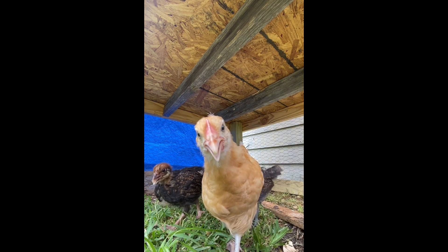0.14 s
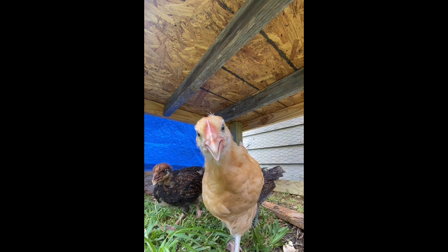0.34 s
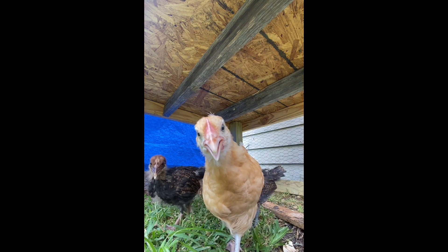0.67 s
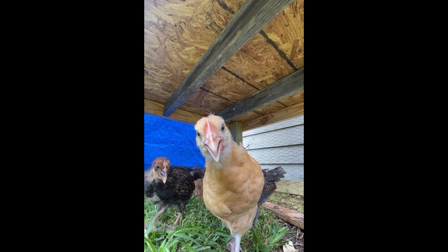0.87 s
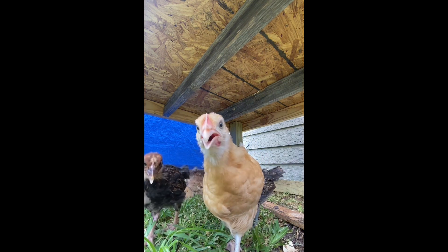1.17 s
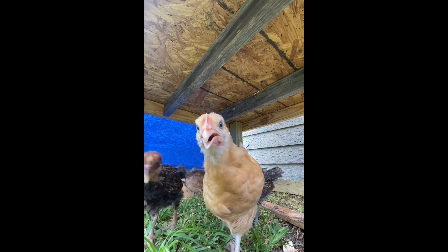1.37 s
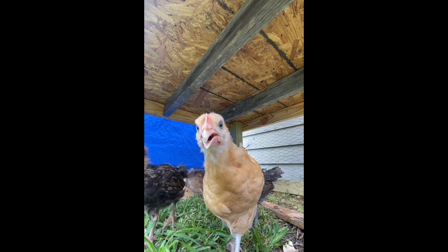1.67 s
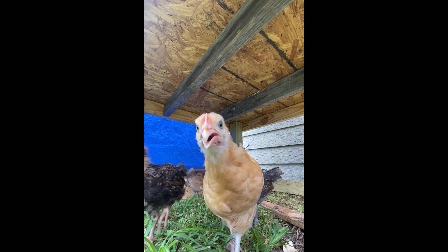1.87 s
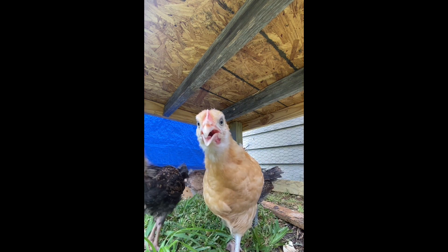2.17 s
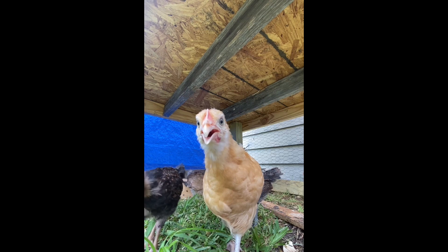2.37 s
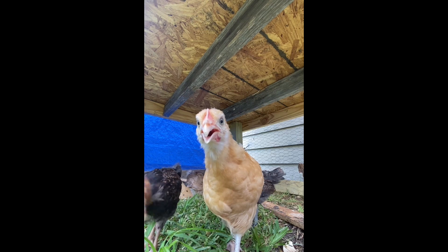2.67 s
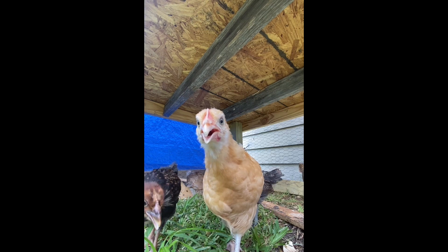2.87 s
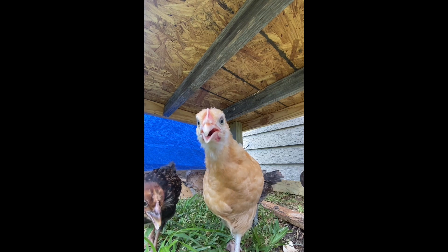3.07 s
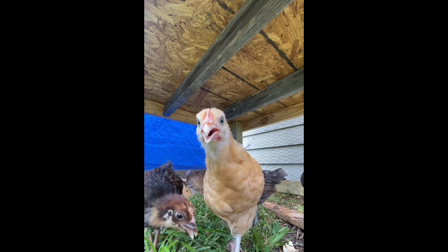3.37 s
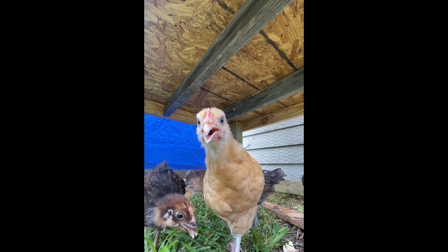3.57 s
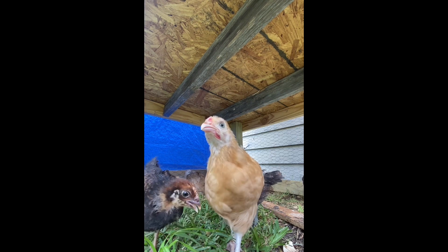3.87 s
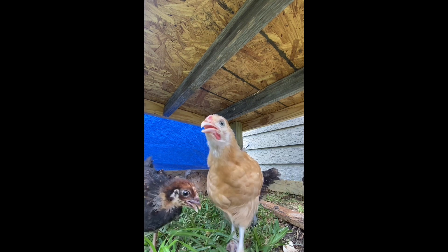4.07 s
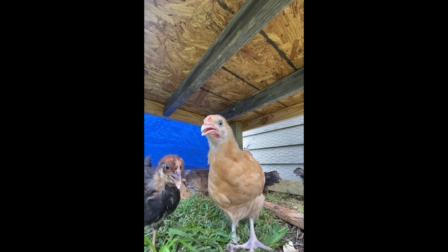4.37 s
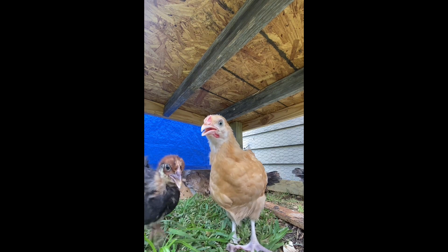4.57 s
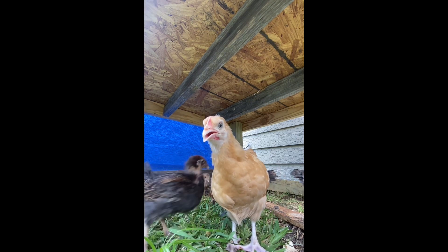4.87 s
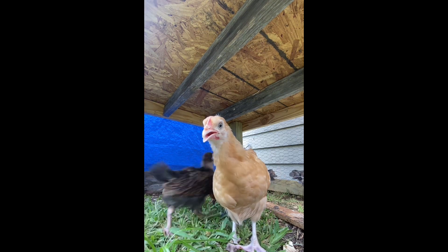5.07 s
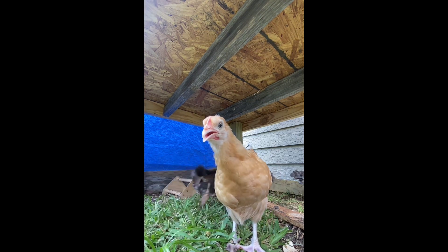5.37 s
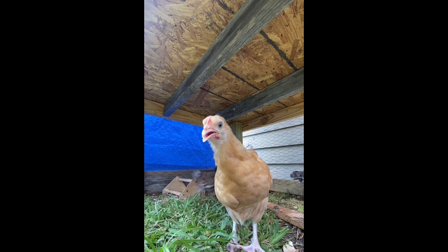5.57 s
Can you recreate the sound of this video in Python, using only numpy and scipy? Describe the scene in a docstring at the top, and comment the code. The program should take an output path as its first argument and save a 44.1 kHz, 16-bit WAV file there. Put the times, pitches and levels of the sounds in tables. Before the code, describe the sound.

Outdoors in a sheltered coop run, a low fan hum and rumble continue throughout. Grass rustles lightly at first, with one peep and faint birds farther away; then a piercing chirp and a soft bird huff. Later, scattered peeps come more often, with foot sweeps, dry snaps and claw ticks, all close in stereo with a very short echo off the boards.

```python
"""A distant fan motor hums over low outdoor rumble while feet rustle and tick in the grass; then young
chickens peep close to a small stereo microphone under a low wooden roof, fainter birds further off.
Hum is wavering sines; rumble and rustle are shaped noise, ticks short band-limited noise bursts.
Peeps are gliding near-sines with weak harmonics; one husky huff is noise through resonances.
A short echo from the roof follows the peeps and ticks."""
import sys
import numpy as np
from scipy import signal
from scipy.fft import rfft, irfft, next_fast_len
from scipy.io import wavfile
from scipy.ndimage import uniform_filter1d

SR = 44100
rng = np.random.default_rng(int(sys.argv[2]) if len(sys.argv) > 2 else 0)


def store_pcm(level_fs):
    """Save levels as 16-bit WAV."""
    pcm = np.round(np.clip(level_fs, -1, 1) * 32767).astype(np.int16)
    wavfile.write(sys.argv[1], SR, np.atleast_2d(pcm).T)


def gain_from_decibels(decibels):
    """Convert decibel values to linear amplitude factors."""
    exponent = np.asarray(decibels, float) / 20
    return 10 ** exponent


N = 252693


def rms_one(x):
    """Scale to rms 1."""
    return x / np.sqrt(np.mean(x ** 2))


def at_hz(points, hz, column):
    """Read one column of a table on a log-frequency axis."""
    points = np.array(points)
    return np.interp(np.log(hz + 1), np.log(points[:, 0] + 1), points[:, column])


def drift(rate_hz):
    """Random wander, spread 1: white noise through two equal one-pole low-passes."""
    r = np.exp(-2 * np.pi * rate_hz / SR)
    wander = signal.lfilter([1], [1, -2 * r, r * r], rng.standard_normal(N + SR))[SR:]
    return wander / wander.std()


# stereo image of the noise layers:
# (frequency [Hz], likeness of the channels [0-1], left leads [rad], left minus right [dB])
STEREO_IMAGE = [(39.7, 0.91, -0.65, -4.5), (130, 1, 0.34, -3.5), (250, 0.82, 0.14, -6),
                (400, .55, 0.94, -8.5), (600, 0.9, 2, -2.5), (1080, 0.4, 3.5, 1), (1500, 0.61, 1.64, 2),
                (2200, .5, 3, 1), (3000, 0.5, 2.5, -0.5), (4780, 0.5, 2, -2.5), (5423, 0.64, 7, -2),
                (7000, 0.9, 7.0, -0.5), (8500, 0.74, 8.0, 1.5), (10000, 0.8, 8, 0), (11500, 1, 10, 1.5),
                (12570, 1, 9.5, 0)]


def stereo_noise(spectrum):
    """Noise of a given spectrum in two channels: partly alike, shifted in phase, leaning to one side."""
    size = next_fast_len(N)
    hz = np.arange(size // 2 + 1) * SR / size
    inside = (hz > spectrum[0][0]) * (hz < spectrum[-1][0])
    shape = gain_from_decibels(at_hz(spectrum, hz, column=1)) * inside * np.sqrt(SR / 2)
    left, other = rfft(rng.standard_normal((2, size))) * shape
    alike = np.clip(at_hz(STEREO_IMAGE, hz, column=1), 0, 1)
    right = alike * left + np.sqrt(1 - alike ** 2) * other
    right = right * np.exp(-1j * at_hz(STEREO_IMAGE, hz, column=2))
    lean = gain_from_decibels(at_hz(STEREO_IMAGE, hz, column=3) / 2)
    return irfft([left * lean, right / lean], size)[:, :N]


# low outdoor rumble, before the stereo lean: (frequency [Hz], density [dB per Hz])
RUMBLE_SPECTRUM = [(15, -105), (22, -90.5), (33, -80), (60, -72), (90, -69.5), (150, -77), (210, -81),
                   (300, -85.5), (420, -85), (560, -90), (1000, -100), (2000, -110), (4000, -121),
                   (8000, -125), (16000, -126)]


def rumble():
    """Low-heavy outdoor noise that swells and sinks a little."""
    return stereo_noise(RUMBLE_SPECTRUM) * gain_from_decibels(0.8 * drift(5.4))


# pitches of the distant fan motor's tones: frequency [Hz]
HUM_HZ = [118.8, 177, 237.6, 254, 355.3, 479.3]
# one row a tone: (rms before the waver [dB], left minus right [dB], phase waver [rad])
HUM_TONES = [(-53.5, -3, 0.84), (-69.5, -6, .6), (-62, -3.5, 0.6), (-63.5, -6, 0.2), (-71, -2.5, .4),
             (-68, -7.5, .15)]


def hum():
    """Motor tones that waver a little in size and phase on the way through the air."""
    t, out = np.arange(N) / SR, 0
    for hz, (level_db, pan_db, waver) in zip(HUM_HZ, HUM_TONES):
        phase = 2 * np.pi * hz * t + waver * drift(2.5)
        tone = np.sqrt(2) * np.sin(phase) * gain_from_decibels(level_db + 2.63 * drift(1.3))
        out = out + tone * gain_from_decibels([[pan_db / 2], [-pan_db / 2]])
    return out


# how busily the flock moves in the grass: (time [s], dull-layer level before steps and flicks [dB])
BUSTLE = [(0.0, -85), (0.2, -90), (0.5, -88), (0.56, -74), (0.7, -77), (0.76, -87), (0.9, -73), (1.2, -73),
          (1.4, -68), (1.62, -62), (1.8, -80), (1.95, -78), (2.15, -68), (2.9, -64), (3.5, -66),
          (3.95, -72), (4.3, -70), (4.55, -64), (4.74, -70), (5.3, -65), (5.73, -70)]
# a foot sweeps through the blades:
# (time [s], dull level [dB], bright minus dull [dB], time to fall 20 dB on either side [s])
STEPS = [(0.04, -63.5, 2.5, .045), (0.215, -90, 8, .02), (0.309, -74, -9, .03), (0.39, -84, 8, .09),
         (0.57, -76, 7, .06), (.65, -80, 6, .09), (0.825, -86, 12, .05), (0.91, -77, 8, .07),
         (1.27, -76, 11, .05), (1.306, -62, -5, .06), (1.62, -72, 7, .12), (2.027, -68, 13, .03),
         (2.245, -62, -15, .09), (2.295, -80, 10.5, .04), (2.47, -65, 7, .045), (2.79, -66, -6, .06),
         (2.854, -78, 8, .05), (3.25, -78, 6, .09), (3.397, -65, 6, .06), (3.65, -72, 7, .04),
         (3.76, -70, 8, .09), (3.886, -70, -1, .05), (4.135, -62, 1.5, .16), (4.375, -74, 5, .07),
         (4.535, -66, 6, .07), (4.65, -80, 9, .2), (4.81, -62, 3, .09), (4.92, -62, -1, .2),
         (4.99, -49, -9, .07), (5.135, -70, 9, .11), (5.28, -68, 6, .11), (5.37, -68, 6, .09),
         (5.49, -62, .1, .07)]
# colour of the two grass layers, shape only: (frequency [Hz], relative density [dB])
BRIGHT_SPECTRUM = [(1000, -7), (2000, 1), (4000, -3.5), (6000, -3), (8000, -1), (9300, -2), (10500, 0.5),
                   (12500, -2.5), (15000, 1.5), (16200, -1.5)]
DULL_SPECTRUM = [(400, -13.5), (700, 4), (1000, 0), (1800, -5), (2700, -6), (4000, -8.5), (6000, -13.5),
                 (7800, -13.5), (10000, -24)]
# bright layer's level when the bustle is at -70 dB, relative to it, and its dB per dB of bustle
BRIGHT_DB, BRIGHT_FOLLOWS = -11.0, 0.75


def rustle():
    """Blades rub: bright and dull noise swells with the bustle and each step, single blades flick out."""
    t = np.arange(N) / SR
    bustle_db = np.interp(t, *np.transpose(BUSTLE))
    dull = gain_from_decibels(bustle_db)
    bright = gain_from_decibels(BRIGHT_DB - 70 + BRIGHT_FOLLOWS * (bustle_db + 70))
    for s, level_db, tilt_db, fade_s in STEPS:
        sweep = gain_from_decibels(level_db - 20 * (np.abs(t - s) / fade_s) ** 1.5)
        dull = np.hypot(dull, sweep)
        bright = np.hypot(bright, sweep * gain_from_decibels(tilt_db))
    # on average 45 flicks a second of random strength, each dying with a 1.8 ms time constant
    flicks = (rng.random(N) < 45.0 / SR) * rng.exponential(1.2, N)
    fall = np.exp(-1 / (0.0018 * SR))
    grain = 1 + signal.lfilter([1], [1, -fall], flicks + 1e-18)
    bright = bright * gain_from_decibels(1.8 * drift(30) + 1.1 * drift(280)) * grain
    dull = dull * gain_from_decibels(1.2 * drift(30) + 1.65 * drift(15)) * grain ** 0.4
    return bright * rms_one(stereo_noise(BRIGHT_SPECTRUM)) + dull * rms_one(stereo_noise(DULL_SPECTRUM))


# stalks snap, claws tick:
# (time [s], level before the band filter [dB], centre [Hz], band edges over centre [ratio, 1.15 or more])
TICKS = [(0.0132, -49, 7000, 1.7), (.040, -49, 7500, 1.6), (0.2163, -60, 9000, 2.2),
         (0.67, -50, 6500, 1.27), (1.047, -58, 10000, 1.5), (1.1425, -61, 2000, 1.2),
         (1.195, -60, 7000, 1.6), (1.255, -48, 10000, 1.6), (1.307, -58, 8000, 1.8),
         (1.769, -43, 1390, 1.7), (2.02, -48, 5000, 3.0), (2.295, -52, 11000, 1.3), (2.369, -58, 5000, 2.6),
         (2.451, -49, 9040, 1.5), (2.78, -51, 11000, 1.4), (2.85, -53, 11000, 1.4), (2.958, -52, 2600, 2.2),
         (3.0315, -48, 2490, 1.4), (3.6513, -46, 7500, 1.8), (3.718, -41, 600, 2.6),
         (3.797, -50, 10000, 1.6), (3.805, -50, 5000, 1.5), (3.9214, -49.5, 7000, 1.6),
         (4.210, -40.5, 2800, 2.1), (4.262, -43.5, 1200, 1.56), (4.269, -43, 7000, 1.5),
         (4.9285, -47, 2600, 1.4), (4.998, -45, 1200, 3.2), (5.393, -49, 1200, 2.15)]
TICK_T60_S = 0.015


def ticks():
    """Each tick is a burst of dying noise in a band around its centre."""
    out, length = np.zeros((2, N)), SR // 10
    t = np.arange(length) / SR
    noise = rms_one(stereo_noise([(300, 0), (16000, 0)]))
    # a weak hiss, the same in both channels, within each tick
    noise = noise + gain_from_decibels(-9) * rng.standard_normal(N)
    envelope = gain_from_decibels(-60 * t / TICK_T60_S) * np.minimum(t / 0.0005, 1)
    for s, level_db, hz, spread in TICKS:
        at, spread = int(s * SR), max(spread, 1.15)
        snap = noise[:, at:at + length] * envelope
        band = signal.butter(2, [hz / spread, min(hz * spread, 16000)], "band", fs=SR, output="sos")
        even = np.sqrt(8000 / hz)   # offsets the narrower band of a low centre
        out[:, at:at + length] += gain_from_decibels(level_db) * signal.sosfilt(band, snap) * even
    return out


# one glide a peep: (time [s], pitch [Hz], level before roughness and port shading [dB])
PEEPS = [
    [(0.411, 2740, -45), (0.418, 2650, -38), (0.426, 2450, -42), (0.43, 2270, -30), (0.437, 2190, -35),
     (0.448, 2290, -33), (0.453, 2560, -34), (0.457, 2760, -42), (0.465, 2880, -49)],
    [(1.244, 2120, -55), (1.259, 2165, -41), (1.267, 2225, -50), (1.276, 2500, -42), (1.283, 2520, -43),
     (1.298, 2500, -51)],
    [(1.401, 3900, -39), (1.405, 4350, -35), (1.415, 4576, -26), (1.42, 4285, -30), (1.4235, 3330, -18),
     (1.426, 3130, -15.5), (1.428, 3800, -27), (1.43, 4330, -25.5), (1.434, 4520, -27), (1.438, 4450, -29),
     (1.441, 3850, -26), (1.4445, 2950, -20), (1.4485, 2720, -30), (1.451, 3050, -19), (1.4535, 3300, -21),
     (1.456, 3750, -40), (1.459, 3900, -35), (1.464, 3150, -42)],
    [(2.565, 2130, -55), (2.57, 2200, -44), (2.577, 2245, -44), (2.581, 2380, -54), (2.585, 2480, -45),
     (2.594, 2800, -40), (2.6, 3020, -50), (2.605, 3070, -52), (2.611, 2700, -47)],
    [(3.218, 2340, -46), (3.224, 2420, -38), (3.236, 2430, -33), (3.245, 2290, -43), (3.254, 2320, -45),
     (3.26, 2410, -34.5), (3.268, 2560, -47), (3.278, 2900, -46), (3.284, 2900, -51)],
    [(3.584, 2160, -46), (3.605, 2390, -30), (3.614, 2650, -38), (3.619, 2850, -50), (3.628, 2800, -38),
     (3.633, 2900, -45)],
    [(3.724, 1676, -33.5), (3.728, 2255, -32), (3.732, 2950, -44), (3.74, 3390, -39), (3.748, 3430, -43),
     (3.753, 3330, -41), (3.76, 3080, -47), (3.768, 2600, -40), (3.776, 2250, -27.5), (3.786, 2137, -35.5)],
    [(4.086, 2120, -44), (4.092, 2350, -34), (4.101, 2310, -40), (4.107, 2430, -36), (4.118, 2940, -42),
     (4.128, 3240, -45), (4.14, 3000, -47)],
    [(4.118, 1653, -32), (4.121, 1700, -26), (4.126, 2254, -26), (4.128, 2750, -46), (4.132, 3100, -38),
     (4.142, 3320, -42), (4.15, 3100, -40), (4.155, 2650, -36), (4.163, 2240, -35), (4.167, 2200, -29),
     (4.173, 2200, -39), (4.183, 2200, -47)],
    [(4.357, 2300, -50), (4.361, 2330, -28), (4.372, 2480, -28), (4.376, 2620, -32), (4.381, 2800, -47),
     (4.387, 2950, -46), (4.394, 3060, -51), (4.402, 2940, -55)],
    [(4.496, 3640, -28), (4.5, 3680, -23), (4.516, 3540, -24), (4.534, 3270, -24.5), (4.54, 2950, -32),
     (4.546, 2840, -32), (4.555, 2780, -49)],
    [(4.637, 2400, -51), (4.642, 2400, -53), (4.648, 2470, -43), (4.656, 2600, -51), (4.66, 2800, -49),
     (4.668, 3210, -59), (4.679, 3350, -58)],
    [(4.792, 2700, -45), (4.801, 2720, -39), (4.817, 2473, -30), (4.832, 2440, -29.5), (4.838, 2600, -33),
     (4.845, 2900, -48), (4.85, 3300, -48), (4.862, 2600, -50)],
    [(5.022, 2070, -36), (5.026, 2090, -29), (5.033, 2097, -25.5), (5.037, 2050, -38), (5.04, 2014, -30),
     (5.047, 1980, -37), (5.051, 1960, -55), (5.058, 2040, -46), (5.063, 2000, -48)],
    [(5.44, 2620, -55), (5.448, 2510, -58), (5.453, 2500, -47), (5.459, 2380, -52), (5.464, 2230, -58)],
    [(5.532, 2600, -54), (5.546, 3220, -53), (5.556, 2700, -36), (5.563, 2520, -32), (5.57, 2480, -32),
     (5.575, 2340, -51), (5.58, 2310, -43), (5.587, 2200, -30), (5.592, 2120, -40), (5.608, 2450, -48),
     (5.619, 2504, -35), (5.63, 2550, -45)],
]
# one row a peep: (left lags [ms], 2nd and 3rd harmonic before windpipe and lift [dB, dB],
# hoarseness [ratio], extra rasp at the end [ratio])
VOICES = [(-0.13, -16.5, -32, 0.029, 0.27), (0.158, -26, -46, 0.074, 0.55), (-0.313, -31, -43, .02, 0.23),
          (0.198, -26, -44, .05, 0.37), (0.689, -19, -21, .02, 1.2), (.59, -33, -50, 0.053, 1.3),
          (-0.484, -14, -32, .03, 0.047), (0.184, -36, -49, .1, 1.4), (0.01, -19, -41, 0.25, 0.24),
          (0.58, -31, -50, .05, 1.4), (-0.61, -49.5, -51, 0.014, 0.2), (0.547, -29, -46, 0.25, 1.6),
          (0.27, -27.5, -44, 0.046, 0.72), (-0.188, -19, -46, 0.08, 0.15), (0.26, -36, -47, 0.25, .3),
          (-0.087, -16.5, -24, 0.077, .4)]
# the voice breaks, every second cycle weaker:
# (middle [s], half length [s], half-pitch tone [dB], 3/2-pitch tone [dB])
BREAKS = [(1.267, 0.0058, -2.5, -8.5), (3.597, 0.0087, -10.5, -22), (4.097, 0.0083, -10, -15),
          (5.031, 0.0088, -29, -21), (5.604, 0.0047, 3.5, -11.5)]
# what the windpipe passes of the harmonics: (frequency [Hz], gain [dB])
WINDPIPE = [(3000, -32), (4300, -6), (5600, -2), (6700, 4), (8500, -1.5), (10500, -11.5), (13000, -4.5)]
# microphone body and nearby boards shade one port more at some pitches:
# (pitch [Hz], left minus right [dB])
SHADE = [(1650, 3), (2010, 8), (2090, -11), (2180, -8), (2260, .1), (2480, -6), (2850, -2.5), (3250, -14),
         (3420, -15), (3650, -11), (4300, -2.5)]
# swell before a glide and dying after it, on top of the edge fade; room left for each
ATTACK_DB_PER_S, RELEASE_DB_PER_S, EDGE_S = 5000.0, 2500.0, 0.012


def peeps():
    """A syrinx near-sine with weak harmonics; hoarseness shakes size and pitch, growing as breath runs out."""
    out, tremor, wobble = np.zeros((2, N)), drift(290), drift(306)
    second_waver, third_waver = drift(90), drift(90)
    for rows, (lag_ms, second_db, third_db, hoarse, rasp) in zip(PEEPS, VOICES):
        s, pitch, level_db = np.transpose(rows)
        span = slice(int((s[0] - EDGE_S) * SR), int((s[-1] + EDGE_S) * SR))
        t = np.arange(span.start, span.stop) / SR
        progress = (t - t[0]) / (t[-1] - t[0])
        rough = hoarse + rasp * progress ** 4.0

        glide = uniform_filter1d(np.interp(t, s, pitch), size=88)
        hz = glide * (1 + 0.071 * rough * wobble[span])
        phase = 2 * np.pi * np.cumsum(hz) / SR

        fade = np.clip(np.minimum(t - t[0], t[-1] - t) / 0.005, 0, 1) ** 2
        level = np.interp(t, s, level_db)
        level = level - ATTACK_DB_PER_S * np.maximum(s[0] - t, 0)
        level = level - RELEASE_DB_PER_S * np.maximum(t - s[-1], 0)
        size = gain_from_decibels(level) * fade * (1 + rough * tremor[span]) / np.sqrt(1 + rough ** 2)

        # the throat lifts the fundamental at some pitches; harmonics swell less
        lift_db = 0.57 * np.minimum(level.max() - level, 14)
        second_db = second_db + lift_db + at_hz(WINDPIPE, 2 * hz, column=1)
        third_db = third_db + lift_db + at_hz(WINDPIPE, 3 * hz, column=1)
        second = gain_from_decibels(second_db + 3.5 * second_waver[span])
        third = gain_from_decibels(third_db + 3.0 * third_waver[span])
        # harmonics are strongest in mid call and dissolve in rasp
        voiced = np.abs(np.sin(np.pi * progress)) ** 1.2 / (1 + rough ** 2)

        pan_db = at_hz(SHADE, glide, column=1)
        for side, sign in enumerate([1, -1]):
            p = phase - sign * np.pi * hz * lag_ms / 1000   # the nearer port hears it first
            tone = np.sin(p) + voiced * (second * np.sin(2 * p) + third * np.sin(3 * p))
            for middle, half, half_db, upper_db in BREAKS:
                broken = np.exp(-((t - middle) / half) ** 4)
                subtones = gain_from_decibels(half_db) * np.sin(p / 2) + gain_from_decibels(upper_db) * np.sin(3 * p / 2)
                tone = tone + broken * subtones
            out[side, span] += size * np.sqrt(2 / (1 + gain_from_decibels(-2 * sign * pan_db))) * tone
    return out


# distant birds: (time [s], length [s], from [Hz], to [Hz], peak midway between the channels' levels [dB])
FAR_PEEPS = [(0.708, 0.026, 3000, 3250, -67), (0.882, 0.033, 3100, 2880, -67),
             (1.031, .022, 2980, 2800, -68), (1.357, 0.041, 2760, 2750, -65.5),
             (2.901, 0.027, 2580, 2650, -63), (2.961, 0.029, 2500, 2430, -62)]


def far_peeps():
    """Birds further off: short faint glides with blurred pitch."""
    out, blur = np.zeros((2, N)), drift(200)
    for s, length_s, from_hz, to_hz, level_db in FAR_PEEPS:
        at, size = int(s * SR), int(length_s * SR)
        hz = np.linspace(from_hz, to_hz, size) * (1 + 0.045 * blur[at:at + size])
        phase = 2 * np.pi * np.cumsum(hz) / SR
        tone = np.sin(phase - [[0], [2.4]]) * gain_from_decibels([[-2], [2]])   # right channel lags and is louder
        out[:, at:at + size] += gain_from_decibels(level_db) * np.hanning(size) * tone
    return out


# swell of a husky breath: (time [s], level before flutter [dB])
HUFF_SWELL = [(1.46, -77), (1.54, -63.5), (1.63, -65.5), (1.69, -71)]
# resonances of the open beak: (centre [Hz], width [Hz], level [dB])
BEAK_MODES = [(930, 120, -2.5), (2240, 300, -4.5), (3000, 440, -4), (5000, 700, -5), (7700, 600, -2.5)]


def huff():
    """A husky, voiceless breath of a bird: noise through the resonances of its open beak."""
    s, level_db = np.transpose(HUFF_SWELL)
    noise, out = stereo_noise([(300, 0), (16000, 0)]), 0
    for hz, width_hz, mode_db in BEAK_MODES:
        r = np.exp(-np.pi * width_hz / SR)
        poles = [1, -2 * r * np.cos(2 * np.pi * hz / SR), r * r]
        out = out + gain_from_decibels(mode_db) * rms_one(signal.lfilter([1, 0, -1], poles, noise))
    # practically silent outside the breath
    swell_db = np.interp(np.arange(N) / SR, s, level_db, left=-150, right=-150)
    return out * gain_from_decibels(swell_db + 2.5 * drift(40))


ROOF_T60_S, ROOF_DB = 0.08, -18   # echo decay time, echo energy against the direct sound


def under_roof(x):
    """Roof boards, wall and ground return a short dense echo, different at each port."""
    t = np.arange(SR // 4) / SR
    echo = rng.standard_normal((2, len(t))) * gain_from_decibels(-60 * t / ROOF_T60_S) * (t > 0.003)
    echo = echo / np.sqrt(np.sum(echo ** 2, axis=1, keepdims=True))
    return x + gain_from_decibels(ROOF_DB) * signal.fftconvolve(x, echo, axes=1)[:, :N]


def scene():
    """Birds and ticks under the roof, over rustle, hum and rumble."""
    roofed = under_roof(peeps() + far_peeps() + ticks())
    return rumble() + hum() + rustle() + roofed + huff()


def roll_off(x):
    """The treble ends steeply here."""
    return signal.sosfilt(signal.butter(12, 16450, fs=SR, output="sos"), x)


def record(dry):
    """The stereo mix as it is kept."""
    return roll_off(dry)


dry = scene()
out = record(dry)
store_pcm(out)
```